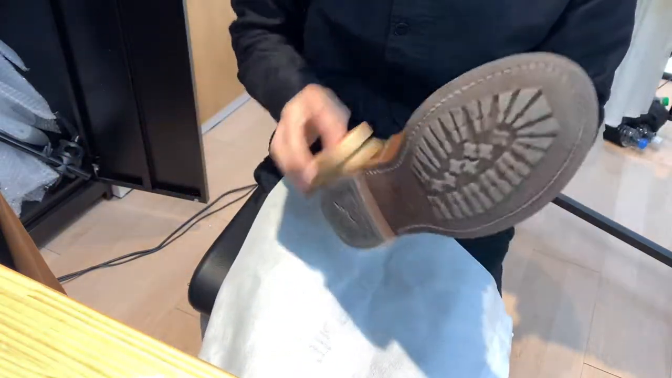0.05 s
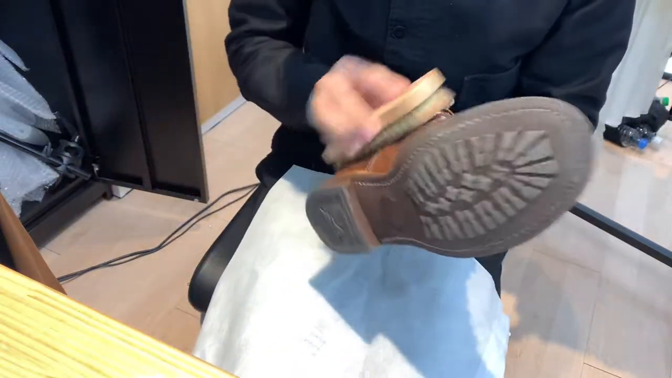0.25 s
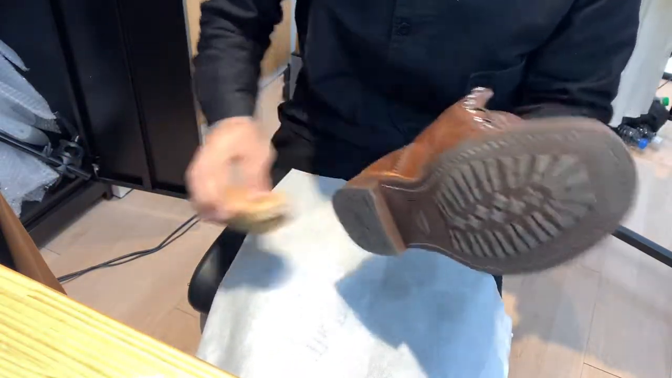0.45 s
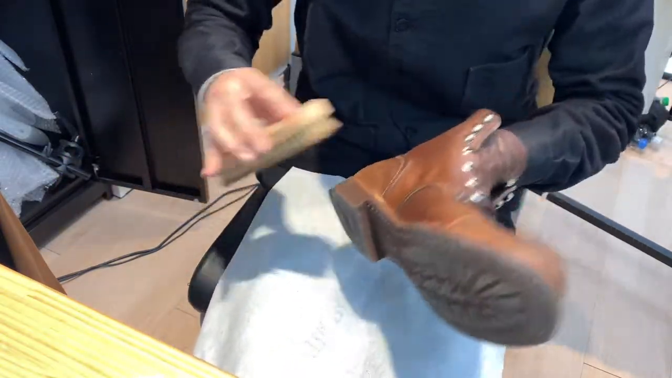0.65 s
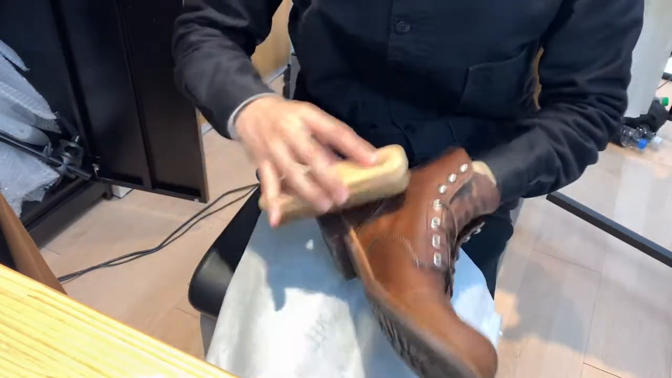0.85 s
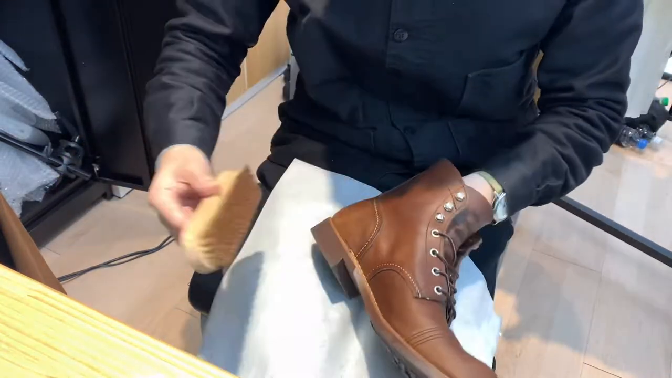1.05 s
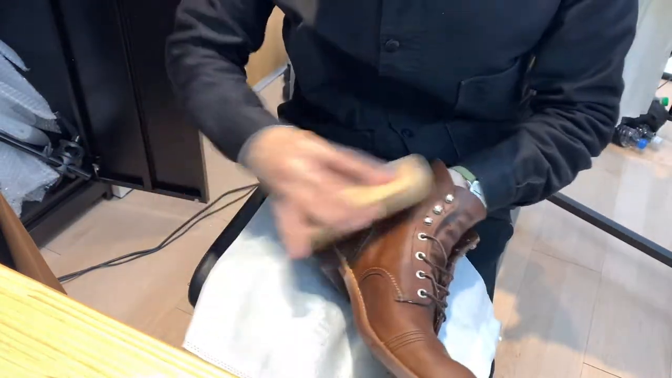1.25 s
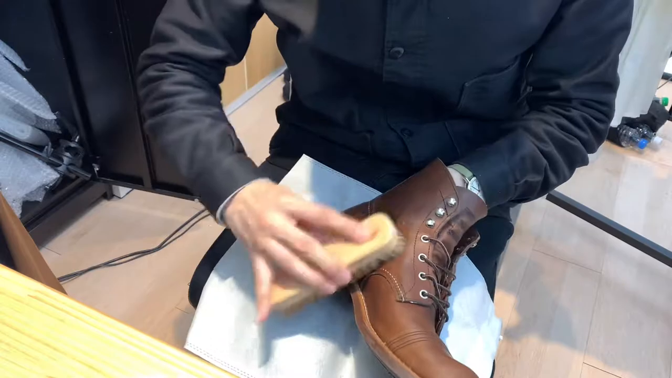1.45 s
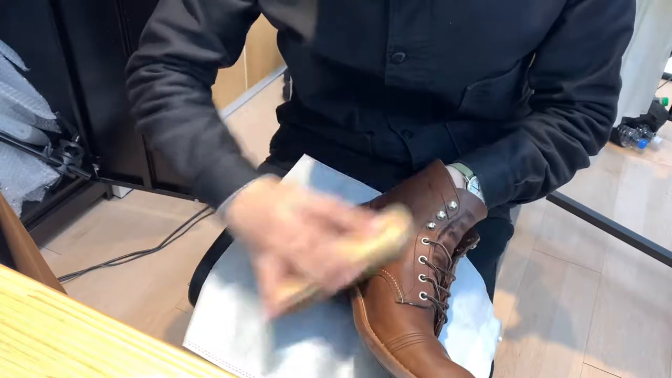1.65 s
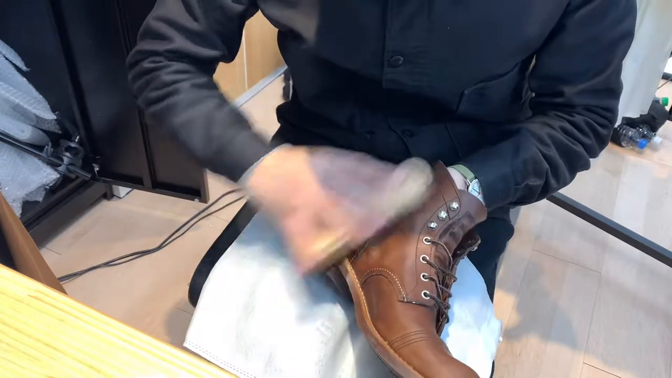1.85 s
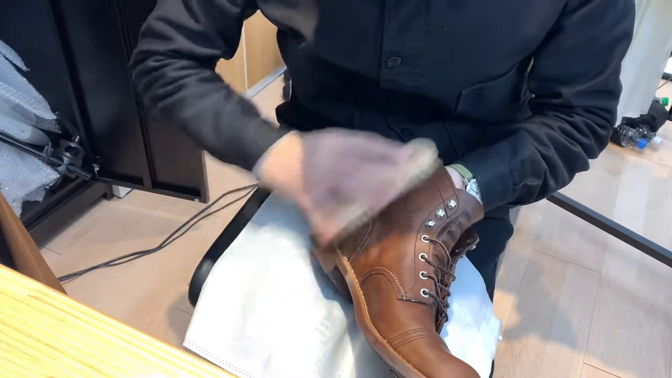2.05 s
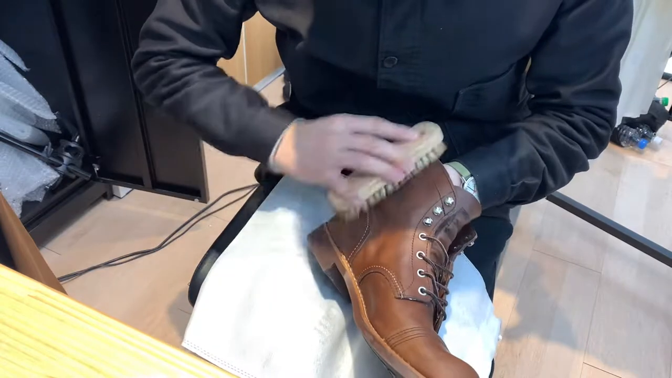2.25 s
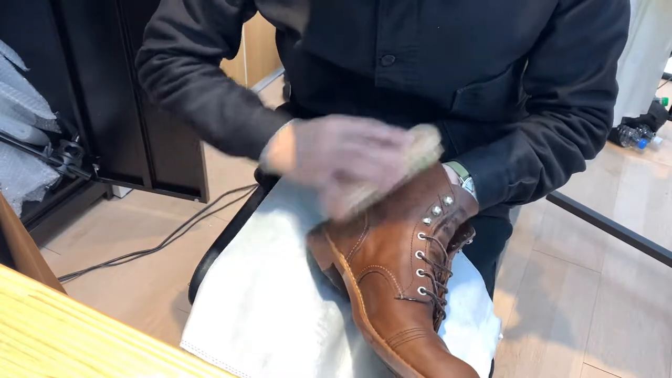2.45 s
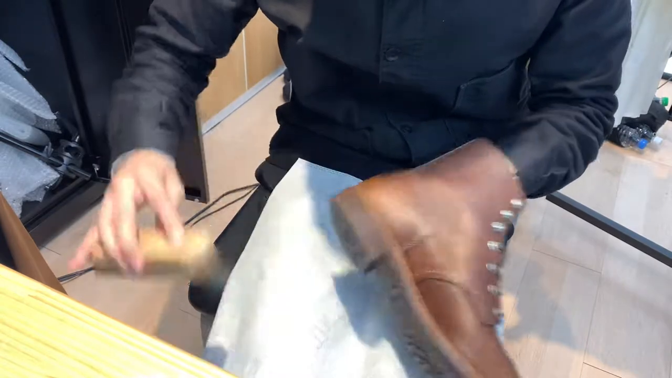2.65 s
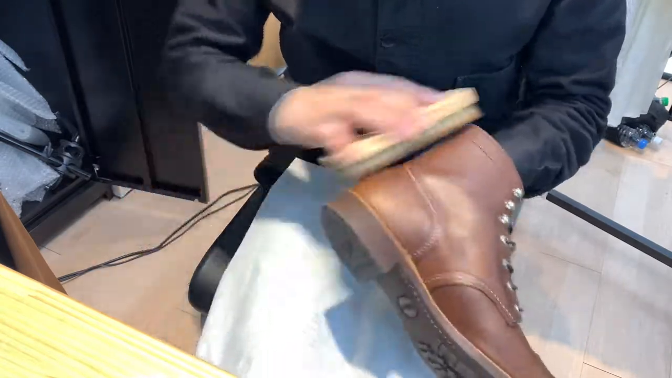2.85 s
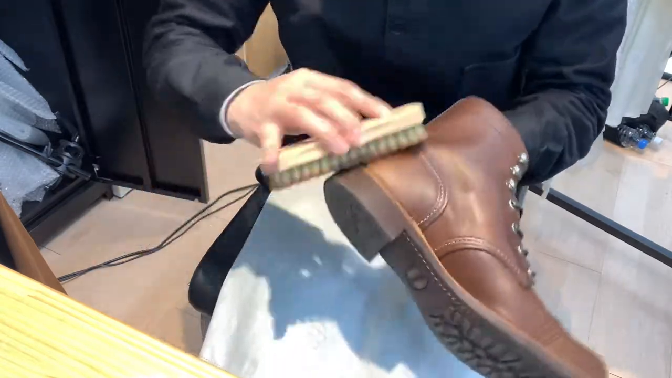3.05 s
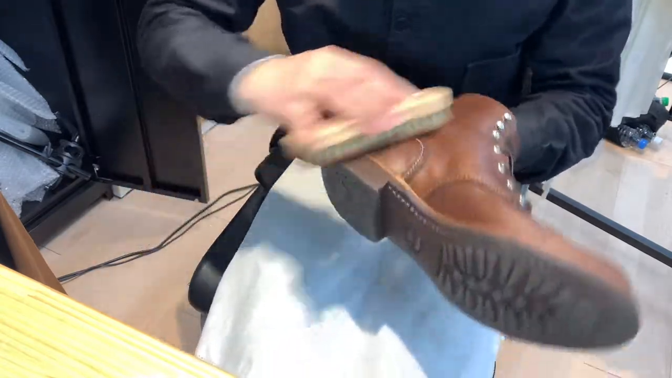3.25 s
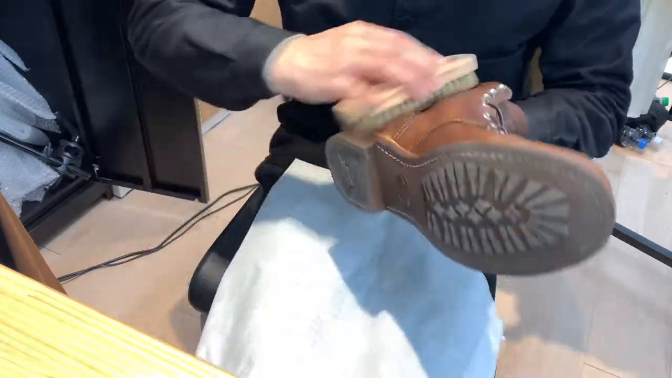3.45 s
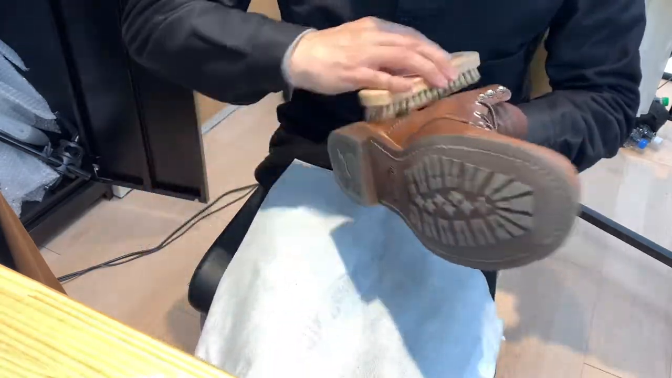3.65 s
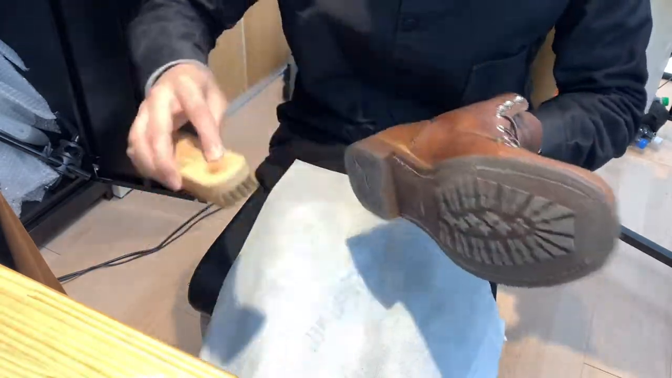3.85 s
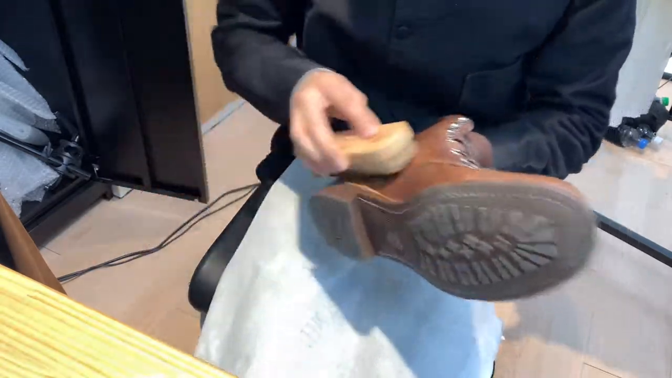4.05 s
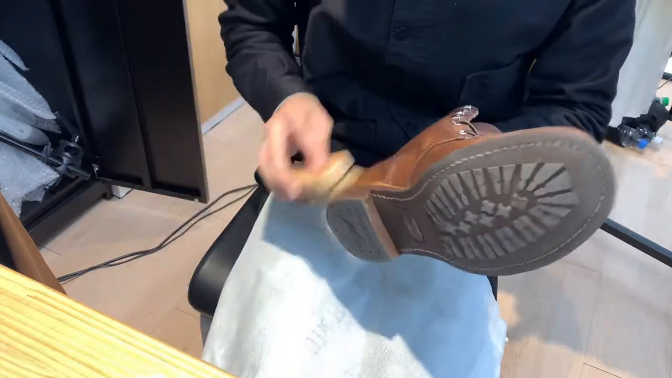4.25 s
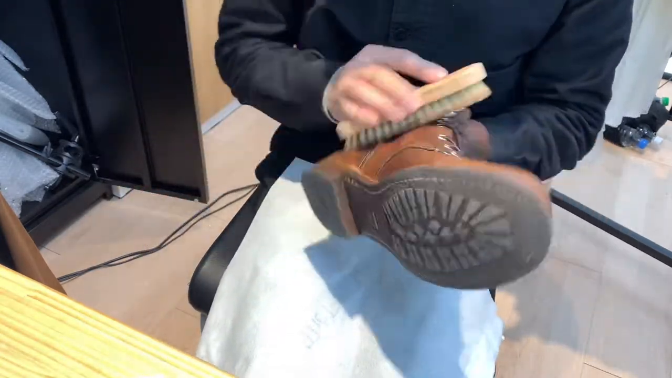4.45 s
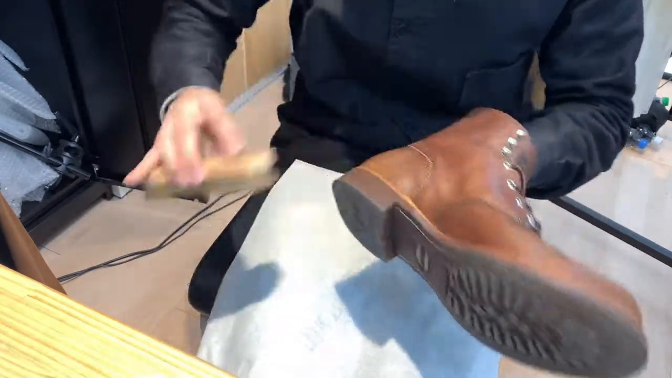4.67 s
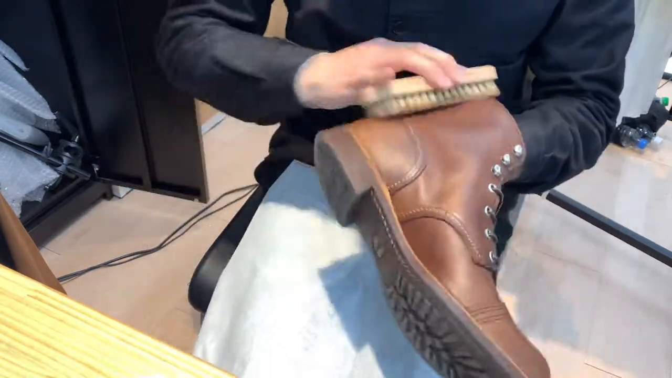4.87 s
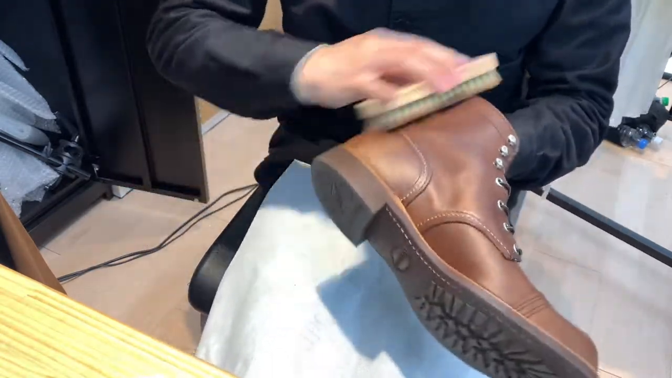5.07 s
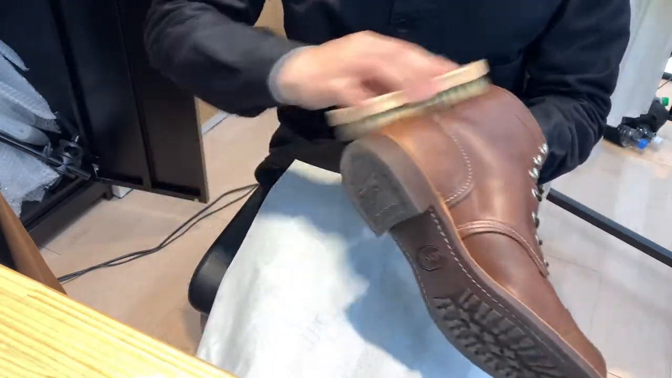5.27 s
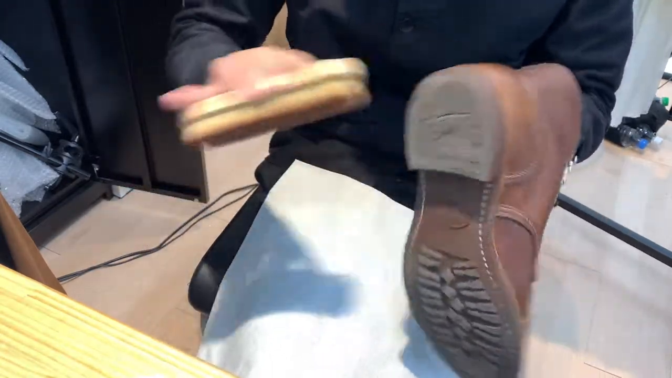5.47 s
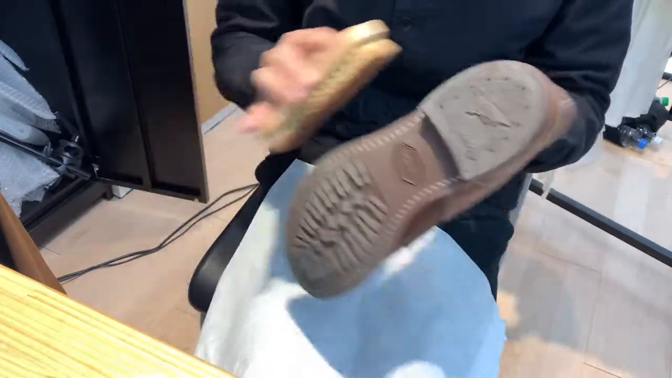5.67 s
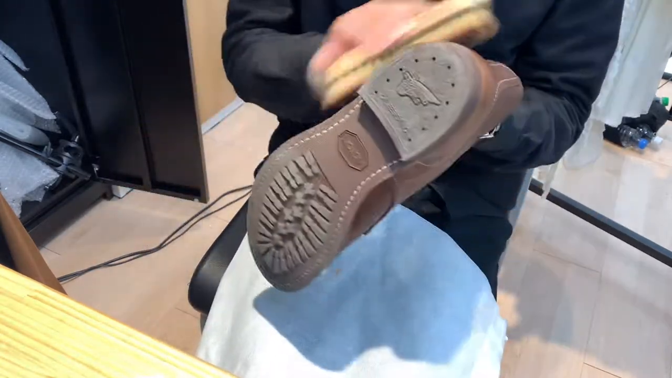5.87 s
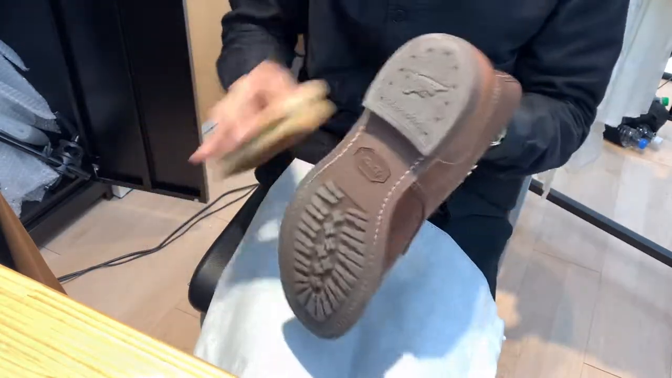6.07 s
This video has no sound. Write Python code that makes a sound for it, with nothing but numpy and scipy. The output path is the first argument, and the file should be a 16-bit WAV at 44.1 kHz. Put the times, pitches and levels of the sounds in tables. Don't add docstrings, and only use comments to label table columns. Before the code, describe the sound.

A bristle brush rasps rapidly back and forth over a hollow leather boot, with short pauses, one hard woody knock and soft thumps, in a small humming room.

```python
import sys
import numpy as np
from scipy import signal
from scipy.fft import rfft, irfft, next_fast_len
from scipy.io import wavfile
from scipy.ndimage import uniform_filter1d, map_coordinates

SR = 44100
rng = np.random.default_rng(int(sys.argv[2]) if len(sys.argv) > 2 else 0)


def boost_factor(decibels):
    exponent = np.asarray(decibels, float) / 20
    return 10 ** exponent


def store_pcm(level_fs):
    pcm = np.round(np.clip(level_fs, -1, 1) * 32767).astype(np.int16)
    wavfile.write(sys.argv[1], SR, np.atleast_2d(pcm).T)


N = 269451
TIME = np.arange(N) / SR


def unit(x):
    return x / np.sqrt(np.mean(x ** 2) + 1e-20)


def along(points, hz):
    point_hz, value = np.transpose(points)
    return np.interp(np.log(hz + 1), np.log(point_hz + 1), value)


def over_time(points, seconds=TIME):
    return np.interp(seconds, *np.transpose(points))


def filtered(x, response):
    size = next_fast_len(N + SR // 2)
    spectrum = rfft(x, size) * response(np.fft.rfftfreq(size, 1 / SR))
    return irfft(spectrum, size)[..., :N]


def coloured(x, curve):
    return unit(filtered(x, lambda hz: boost_factor(along(curve, hz))))


def modes(table):
    def response(f):
        total = 0
        for k, (centre, width, db) in enumerate(table):
            bell = 1j * f * width / (centre * centre - f * f + 1j * f * width)
            total = total + (-1) ** k * boost_factor(db) * bell
        return total
    return response


def wobble(rate):
    coarse = np.arange(0, N + 32, 32)
    knots = rng.standard_normal(int(N * rate / SR) + 4)
    return np.interp(np.arange(N), coarse, map_coordinates(knots, [coarse * rate / SR]))


def slips(spread_db, patchy_db):
    grain = rng.standard_normal((2, N)) * boost_factor(spread_db * rng.standard_normal(N))
    z = signal.stft(grain, nperseg=256)[2]
    field = rng.standard_normal(z.shape[1:])
    field = uniform_filter1d(uniform_filter1d(field, size=4, axis=0), size=8, axis=1)
    return signal.istft(z * boost_factor(patchy_db * unit(field)), nperseg=256)[1][:, :N]


# start in seconds, length in seconds,
# hiss in dB, pressure in dB.
PUSHES = [(.12, .085, -59.5, -1.5), (.149, 0.014, -47, -15), (.216, 0.056, -51.5, 3.5),
          (.902, 0.11, -78.5, 13), (1.464, .072, -44, 1.5), (1.69, 0.071, -42.5, -2),
          (1.925, 0.068, -44, -3), (2.149, 0.073, -45, -2.5), (2.376, 0.073, -44.5, -2.5),
          (3.078, 0.075, -46.5, -0.5), (3.31, 0.071, -43.5, -5.5), (3.535, 0.07, -44.5, -6.5),
          (4.02, 0.078, -49.5, -4), (4.311, 0.021, -47, -20), (4.366, 0.064, -47, -1),
          (5.004, 0.071, -46.5, 1), (5.223, 0.06, -45.5, 0.5)]
# start in seconds, length in seconds, hiss in dB,
# pressure in dB.
PULLS = [(-.02, .1, -46, -11.5), (.317, 0.094, -43.5, -10.5), (1.019, 0.085, -69, 0),
         (1.347, 0.078, -43, 0.5), (1.572, .078, -42.5, -.5), (1.798, 0.085, -41.5, -3),
         (2.024, 0.08, -43, -5), (2.254, .082, -44, -4.5), (2.479, .085, -44, -8.5), (2.927, .1, -47, -2.5),
         (3.184, 0.084, -45.5, -7.5), (3.425, 0.083, -43.5, -8), (3.646, 0.093, -42.5, -10),
         (4.14, .11, -45, -9.5), (4.464, .11, -45.5, -9.5), (4.867, 0.086, -47, -4.5),
         (5.102, 0.077, -45.5, -2), (5.32, 0.089, -47.5, -7), (5.847, 0.12, -48.5, -10)]
# start in seconds, length in seconds,
# hiss in dB, pressure in dB.
DROPS = [
    (1.26, .048, -48.5, 5),
    (2.843, 0.044, -55, 5),
    (3.98, 0.029, -62, -7),
    (4.776, .05, -49, -2),
    (5.716, .06, -53.5, 0),
    (6.091, 0.045, -51, -2.5),
]
# time in seconds, extra drag in dB.
SOLEWARD = [(.3, -5), (.9, 10.5), (1.02, -11), (1.3, -8), (1.8, -4.5), (2.5, -6.5), (2.85, -15),
            (3.2, -10.5), (3.53, -1.5), (3.65, -3.5), (4.02, -2.5), (4.38, -5.5), (4.5, -12), (4.78, -2),
            (5, -15.5), (5.1, -5), (5.35, -11), (5.8, -1)]
PUSH_PEAK, PULL_PEAK, DROP_PEAK = (0.45, 0.26), (0.36, 6.6), (0.28, 0)


def sweep(layer, edge_db, rise, fall, fade_db):
    usual_s, contact_s = 0.08, 0.013
    drag_grows = 0.69
    power = np.zeros(N)
    for rows, (peak, later) in ((PUSHES, PUSH_PEAK), (PULLS, PULL_PEAK), (DROPS, DROP_PEAK)):
        for start, length, hiss_db, press_db in rows:
            place = np.clip(peak + later * (length - usual_s), 0.1, 0.9)
            over_db = {"hiss": 0, "scrape": press_db,
                       "drag": drag_grows * press_db + over_time(SOLEWARD, start)}[layer]
            near = slice(max(0, int((start - length) * SR)), int((start + 2 * length) * SR))
            u = (TIME[near] - start) / length
            before = np.abs((place - u) / place) ** rise
            after = np.abs((u - place) / (1 - place)) ** fall
            shape = np.where(u < place, before, after)
            stroke = boost_factor(hiss_db + over_db - edge_db * shape - fade_db * u) ** 2
            if rows is DROPS:
                stroke = stroke * np.clip(u * length / contact_s + 1, 0, 1) ** 2
            power[near] += stroke
    return np.sqrt(power)


# frequency in Hz, level in dB.
TIPS = [(2500, -14), (4000, -6.5), (5500, -5.5), (6800, -5), (8200, 0.5), (9300, -1), (10500, 0),
        (13000, -2), (14500, -2.5), (15300, -8), (15650, -5), (15800, -22)]
# frequency in Hz, width in Hz, level in dB.
BACK = [(1703, 740, -5), (2630, 740, -2.5), (3025, 470, -1), (3840, 920, -9.5)]
# frequency in Hz, width in Hz, level in dB.
RING = [(2230, 140, 0)]
# time in seconds, ring in dB.
GRIP = [(0, 10.5), (.4, 7.5), (1.301, -12), (1.8, -0.5), (2.5, -1.5), (2.9, 1), (3.3, 2), (3.7, 5),
        (4.1, 4), (4.5, 2.5), (4.8, 7.5), (5.1, -6), (5.4, -15), (5.7, 15), (6.1, 5)]
# frequency in Hz, width in Hz, level in dB.
SOLE = [(576, 153, 5), (820, 350, 2), (1266, 51, 0.5)]


def brush():
    hiss = coloured(slips(spread_db=2, patchy_db=1.3), TIPS)
    scrape = unit(filtered(slips(spread_db=3, patchy_db=1.8), modes(BACK)))
    ring = unit(filtered(slips(spread_db=0, patchy_db=3), modes(RING)))
    back = scrape + boost_factor(over_time(GRIP) - 6 + 3.7 * wobble(11)) * ring
    drag = unit(filtered(slips(spread_db=3, patchy_db=2.5), modes(SOLE)))
    hiss_gain = boost_factor(2 + wobble(40)) * sweep("hiss", edge_db=6, rise=2.7, fall=5.1, fade_db=1.85)
    back_gain = boost_factor(-1.5 + wobble(40)) * sweep("scrape", edge_db=2.5, rise=4.84, fall=7.3, fade_db=6.5)
    drag_gain = boost_factor(-1 + wobble(40)) * sweep("drag", edge_db=2, rise=3.6, fall=4, fade_db=6)
    return hiss_gain * hiss + back_gain * back + drag_gain * drag


# frequency in Hz, width in Hz, level in dB.
BOOT = [(156.5, 63, -12), (230.2, 28, 2), (308, 64, -5), (433, 37, -9)]
# peak in seconds, level in dB, pitch in Hz.
JOLTS = [(.366, -50, 267), (.934, -36.5, 258), (1.584, -40, 254), (1.977, -32, 237), (2.039, -40.5, 287),
         (2.161, -33, 255), (2.274, -30.5, 238), (2.495, -41, 254), (2.61, -51, 244), (2.851, -42.5, 295),
         (2.939, -45, 254), (3.095, -49, 256), (3.203, -45, 259), (3.239, -41, 234), (3.384, -41.5, 222),
         (3.562, -35.5, 259), (3.59, -41, 245), (3.665, -36, 240), (3.729, -38.5, 256), (4.035, -39, 230),
         (4.148, -45, 247), (4.179, -42.5, 250), (4.79, -42.5, 263), (5.331, -39.5, 240),
         (5.434, -46.5, 244), (5.734, -36, 284), (5.849, -43, 249), (5.931, -42.5, 292),
         (6.101, -37.5, 306)]
# peak in seconds, level in dB, pitch in Hz.
SWELLS = [(0.236, -40, 255), (.329, -47, 266), (1.031, -52, 222), (1.372, -35.5, 252), (1.499, -36.5, 238),
          (1.742, -35, 246), (1.84, -34, 203), (2.083, -42.5, 221), (2.201, -33.5, 232.7),
          (2.422, -38, 214), (2.53, -37.5, 255), (3.34, -40, 286.5), (3.448, -46.5, 245),
          (4.411, -36.5, 234), (4.512, -44.5, 260), (4.892, -49, 250), (5.159, -45, 255),
          (5.252, -40, 230.6), (5.67, -46, 259)]
# peak in seconds, level in dB, pitch in Hz, swell in seconds, fade in seconds.
BLOWS = [
    (1.266, -18.5, 289, 0.0044, 0.0079),
    (1.941, -25.5, 263, .011, 0.0085),
]
JOLT_S, SWELL_S = (0.013, 0.017), (0.036, 0.016)


def boot():
    rock, power = np.zeros(N), np.zeros(N)
    waver = np.cumsum(2 * np.pi * 12 * wobble(50) / SR)
    bursts = [(*row, *JOLT_S) for row in JOLTS] + [(*row, *SWELL_S) for row in SWELLS] + list(BLOWS)
    for peak, db, hz, swell, fade in bursts:
        near = slice(int((peak - 4 * swell) * SR), int((peak + 4 * fade) * SR))
        u = TIME[near] - peak
        shape = np.where(u < 0, np.abs(u / swell) ** 2.8, np.abs(u / fade) ** 1.7)
        gain = boost_factor(db - 7.3 * shape)
        rock[near] += gain * np.sqrt(2) * np.sin(2 * np.pi * hz * u + waver[near])
        power[near] += gain ** 2
    noise = rng.standard_normal((2, N))
    rough = unit(filtered(noise, lambda f: modes(BOOT)(f) * f * f / (f * f + 120 ** 2)))
    under = sweep("hiss", edge_db=0.5, rise=13, fall=7.7, fade_db=5.2)
    rough_gain = boost_factor(-6) * np.sqrt(power) + boost_factor(-9.5) * under
    return boost_factor(-2.5) * rock * [[1], [0.3]] + rough_gain * rough


# time in seconds, peak in dB, brush back in dB over it, thud in dB over it.
LANDINGS = [(0.228, -41.5, -11, 16), (0.919, -43.5, -15, 11), (1.259, -29, -28, 7.5),
            (1.458, -32.5, -7, 6.5), (1.565, -42.5, -5, 8), (1.683, -29.5, -9.5, -10), (1.794, -40, -9, 11),
            (1.929, -31.5, -3, 7.5), (2.028, -37.5, -11, 5.5), (2.154, -32.5, -3, 5.5),
            (2.257, -44, 4.5, 13), (2.376, -35.5, -5.5, 8.5), (2.482, -40.5, -1.5, 9),
            (2.84, -44.5, -6, 10.5), (3.314, -51.5, -8, 23.5), (3.55, -38.5, -9, 14.5),
            (4.014, -58, -11, 21), (4.359, -56, -6, 7), (4.778, -45.5, -11, 8), (5.002, -51, 5, -6),
            (5.228, -42, 8, 1), (5.718, -33.5, -4.5, 8.5), (5.833, -46.5, -7, 19.5), (5.915, -41, 0.5, -4),
            (6.088, -48, -4.5, 7)]


def landings():
    sole, back, push = np.zeros((2, N + SR)), np.zeros((2, N + SR)), np.zeros(N + SR)
    t = np.arange(SR // 20) / SR
    onset = 1 - np.exp(-t / 0.0006)
    decay = boost_factor(-60 * t / 0.042) + boost_factor(-11.5 - 60 * t / 0.13)
    press = np.sin(np.pi * np.clip(t / 0.004, 0, 1)) ** 2
    for start, db, back_db, thud_db in LANDINGS:
        first = round(start * SR)
        at = slice(first, first + len(t))
        slap = onset * decay * rng.standard_normal((2, len(t)))
        sole[:, at] += boost_factor(db + 5.5) * slap
        back[:, at] += boost_factor(db + back_db + 10.5) * slap
        push[at] -= boost_factor(db + thud_db + 9) * press
    wood = filtered(back[:, :N], lambda f: modes(BACK)(f) + boost_factor(2) * modes(RING)(f))
    thud = filtered(push[:N], modes(BOOT)) * [[1], [0.3]]
    return filtered(sole[:, :N], modes(SOLE)) + wood + thud


# frequency in Hz, width in Hz, level in dB.
HEEL = [(149, 51, -2.5), (255, 93, -.5), (345, 100, -5)]
# time in seconds, level in dB.
KNOCK = (1.2605, -8)


def knock():
    start, db = KNOCK
    push = boost_factor(db) * np.sin(np.pi * np.clip((TIME - start) / 0.0026, 0, 1)) ** 2
    return -filtered(push, modes(HEEL)) * [[1], [0.2]]


# time in seconds, peak in dB, pitch in Hz.
TICKS = [
    (.838, -66, 6100),
    (5.646, -68, 9000),
    (5.66, -66, 9400),
]


def ticks():
    out, t = np.zeros(N + SR), np.arange(SR // 20) / SR
    for start, db, hz in TICKS:
        first = round(start * SR)
        out[first:first + len(t)] += boost_factor(db - 60 * t / 0.025) * np.sin(2 * np.pi * hz * t)
    return out[:N] * [[1], [0.3]]


# time in seconds, level in dB.
SLEEVE = [(.6, -95), (.85, -71), (1.08, -65), (1.2, -74), (2.55, -80), (2.75, -77), (3.9, -79), (4.7, -74),
          (5.4, -73), (5.6, -69.5), (5.72, -68), (6.05, -78)]
# frequency in Hz, level in dB per Hz.
CLOTH = [(300, -16), (900, -3), (2000, 8), (4000, -4.5), (8000, -10), (15000, -18)]


def sleeve():
    return boost_factor(over_time(SLEEVE)) * coloured(slips(spread_db=4, patchy_db=3), CLOTH)


# frequency in Hz, 60 dB decay time in seconds.
ROOM = [(200, 0.26), (2000, 0.33), (10000, 0.19)]


def walls(pair):
    hz, t, z = signal.stft(rng.standard_normal((2, SR // 3)), SR, nperseg=256)
    decay = boost_factor(-60 * t / along(ROOM, hz)[:, None])
    tail = signal.istft(z * decay, SR, nperseg=256)[1]
    return signal.fftconvolve(pair, tail / np.linalg.norm(tail[0]), axes=1)[:, :N]


# frequency in Hz, level in dB per Hz.
AIR = [(20, -38), (45, -14), (60, -11), (86, -13.5), (130, -13.5), (185, -17), (240, -14), (390, -22),
       (700, -25.5), (1000, -33.5), (1700, -38.5), (2300, -41.5), (3000, -50.5), (4500, -59)]
# time in seconds, level in dB.
DRAUGHT = [(0, 2), (.6, -1), (1.1, 1), (2.7, 1), (3.9, 0.5), (4.7, 0.5), (5.55, 1), (6.1, 0.5)]
# frequency in Hz, level in dB per Hz.
MIC_HISS = [(2000, -24), (4500, -2), (5400, -5), (6100, 6), (6700, 7), (7400, 5), (9000, 0.5), (12000, -1),
            (15500, -4)]
# frequency in Hz, level in dB.
HUM = [(59, -66), (118, -57.5), (184, -62.5), (237, -61)]


def air():
    rush = coloured(rng.standard_normal((2, N)), [*AIR, (16000, -81)])
    hiss = coloured(rng.standard_normal((2, N)), MIC_HISS)
    hum = np.zeros(N)
    for hz, db in HUM:
        level = boost_factor(db + 2.5 + 2.5 * wobble(4.4))
        hum += level * np.sin(2 * np.pi * hz * TIME + 0.77 * wobble(6.6))
    rush_gain = boost_factor(-54 + over_time(DRAUGHT))
    hiss_gain = boost_factor(-79.5 + 0.84 * wobble(2.35))
    return rush_gain * rush + hiss_gain * hiss + hum * [[1], [0.2]]


# frequency in Hz, phase in radians by which left leads.
LEAD = [(0, 0), (2300, 0.73), (3000, 1.16), (4600, 1.08), (6300, 1.25), (7000, -np.pi), (9300, -2 * np.pi),
        (11500, -3 * np.pi), (14000, -4 * np.pi), (14800, -14.5), (15500, -14.5), (16000, -12)]
# frequency in Hz, left over right in dB.
TILT = [(60, 0), (110, -1.5), (200, 0), (380, -1), (700, 1.5), (1290, -1.5), (2380, -0.5), (4400, -4),
        (8120, 1), (15000, -0.5)]


def ports(pair, alike):
    def blend(hz):
        turn = np.arccos(np.clip(along(alike, hz), -1, 1)) / 2
        return np.array([np.cos(turn), np.sin(turn)])

    def offset(hz):
        lead = np.interp(hz, *np.transpose(LEAD))
        tilt = np.log(boost_factor(along(TILT, hz)))
        return np.exp(np.outer([0.5, -0.5], 1j * lead + tilt))

    common, apart = filtered(pair, blend)
    return filtered(np.array([common + apart, common - apart]), offset)


# frequency in Hz, likeness from 0 to 1.
ALIKE = [(200, 0.93), (640, 0.71), (1400, 0.53), (2400, 1), (4400, 0.75), (5500, 0.4), (7200, 0.34),
         (8500, 1), (15000, 1)]
# frequency in Hz, likeness from 0 to 1.
AIR_ALIKE = [(60, 0.93), (130, 0.8), (300, 0.77), (640, 0), (5000, 0), (8500, 1)]


def scene():
    work = brush() + boot() + landings() + knock() + ticks()
    close = ports(work + boost_factor(-7.5) * walls(work), ALIKE)
    return close + ports(air() + sleeve(), AIR_ALIKE)


def top_cut(x):
    return signal.sosfilt(signal.butter(12, 15840, fs=SR, output="sos"), x)


def record(dry):
    return top_cut(dry)


dry = scene()
out = record(dry)
store_pcm(out)
```